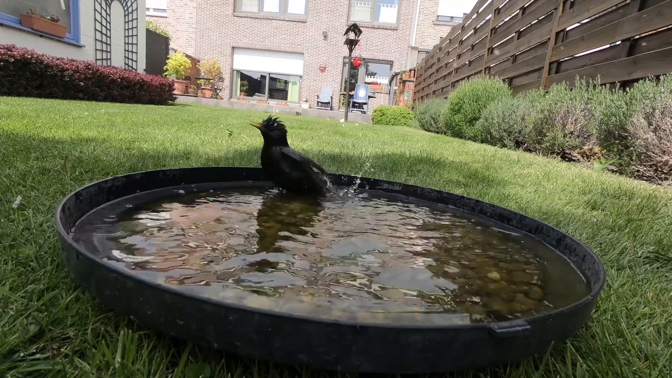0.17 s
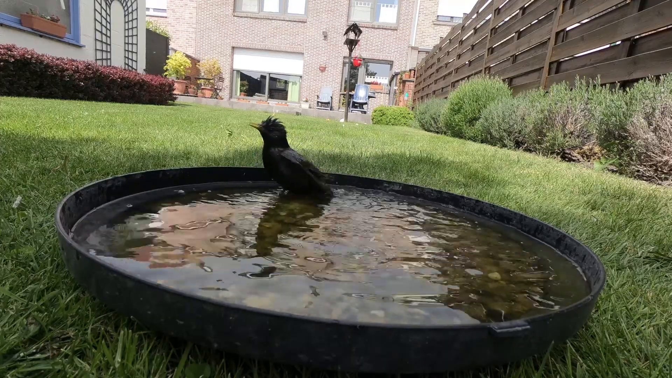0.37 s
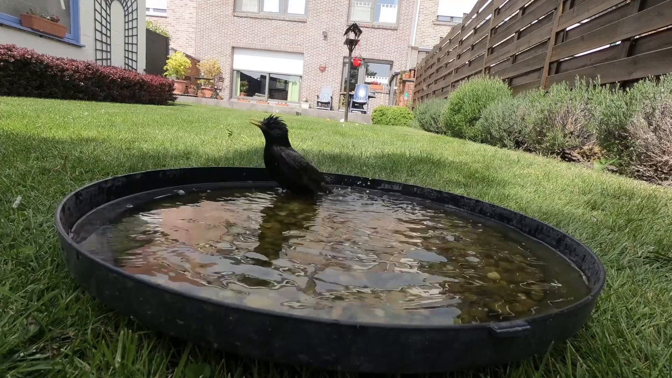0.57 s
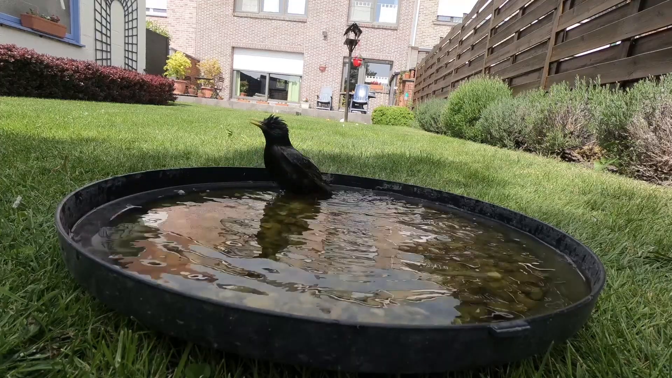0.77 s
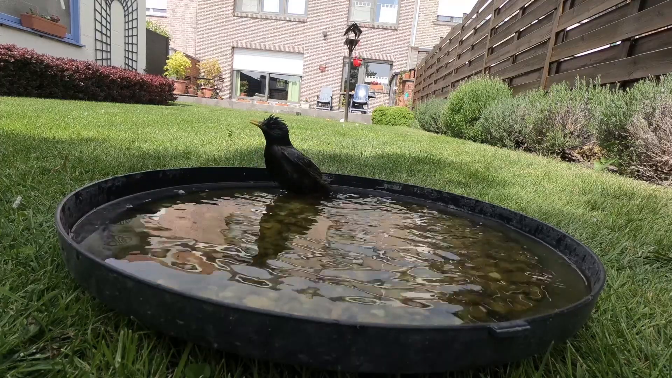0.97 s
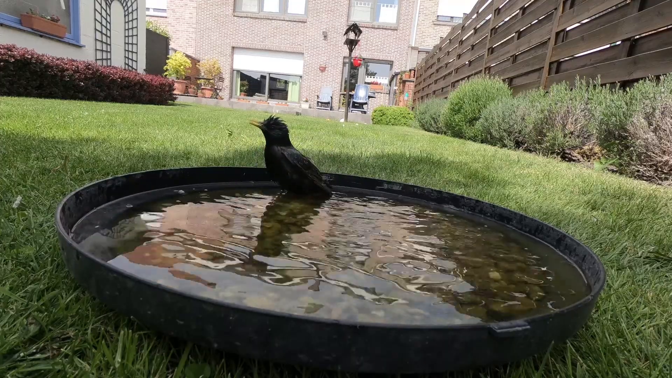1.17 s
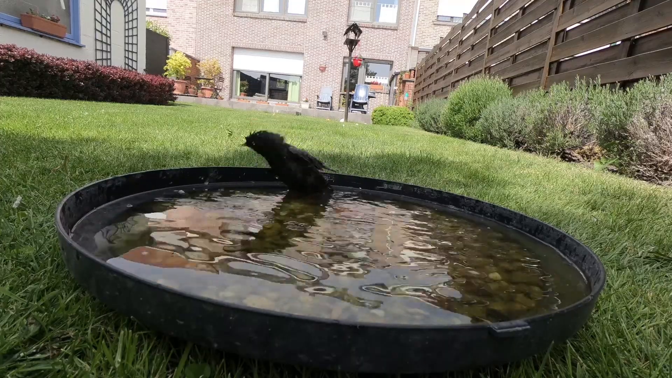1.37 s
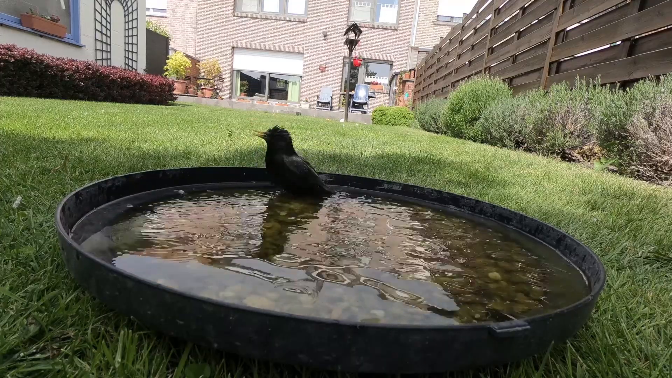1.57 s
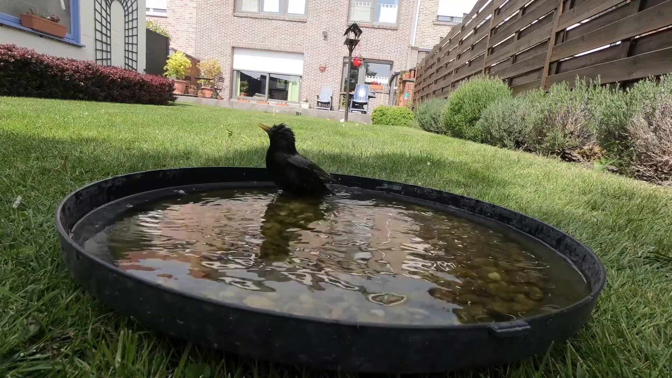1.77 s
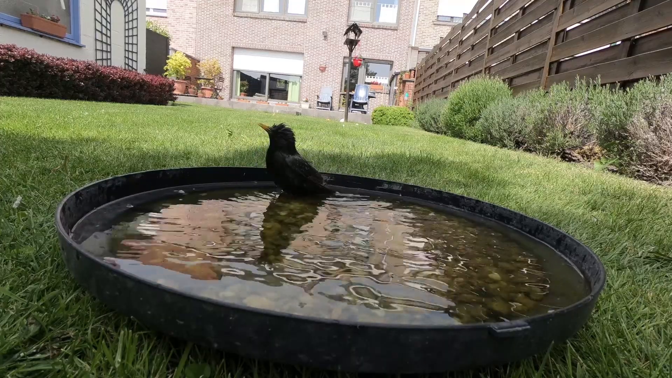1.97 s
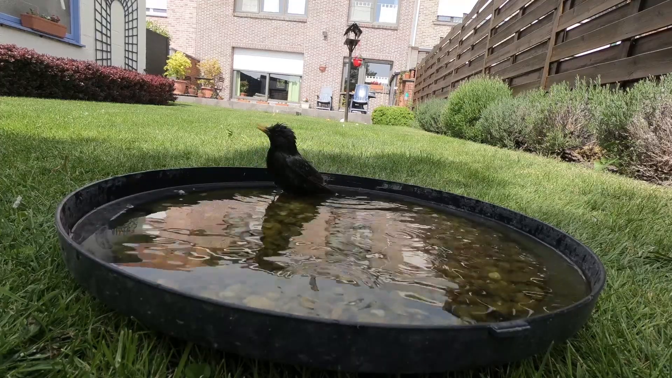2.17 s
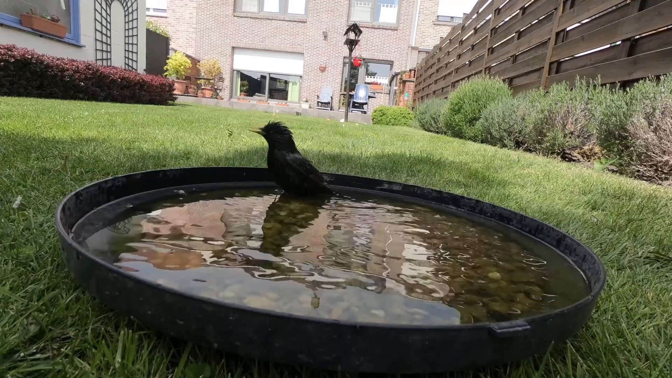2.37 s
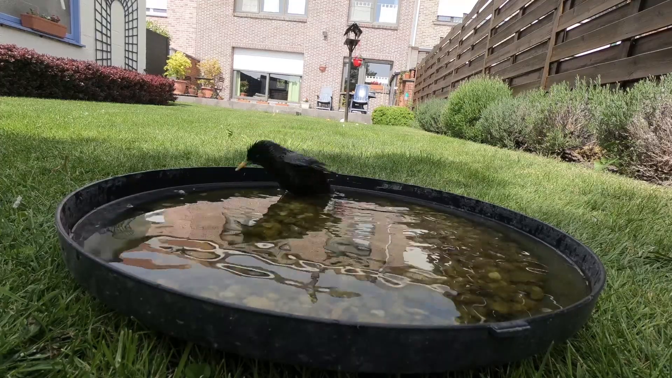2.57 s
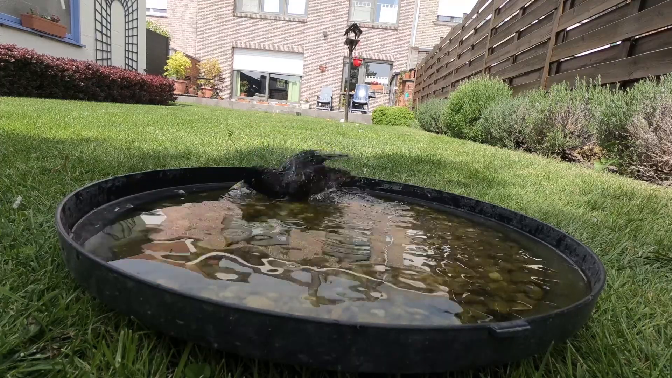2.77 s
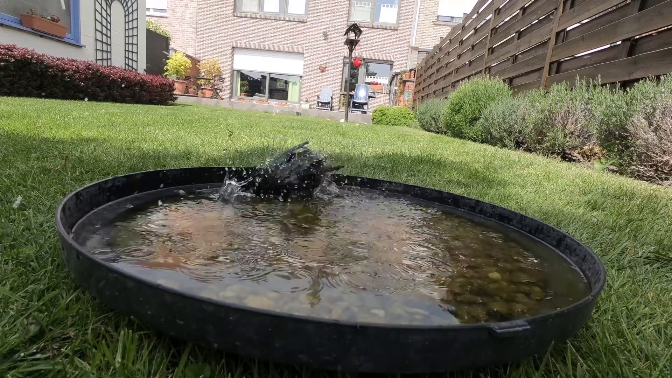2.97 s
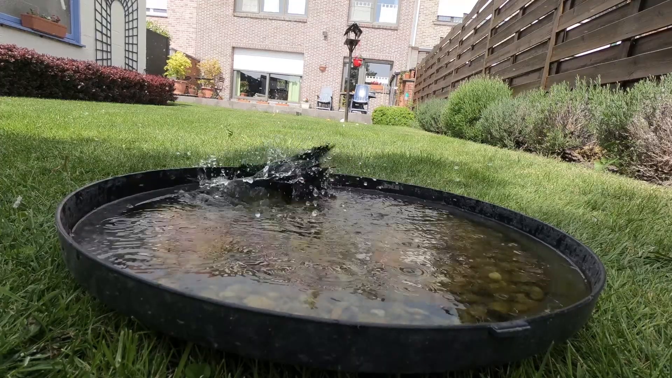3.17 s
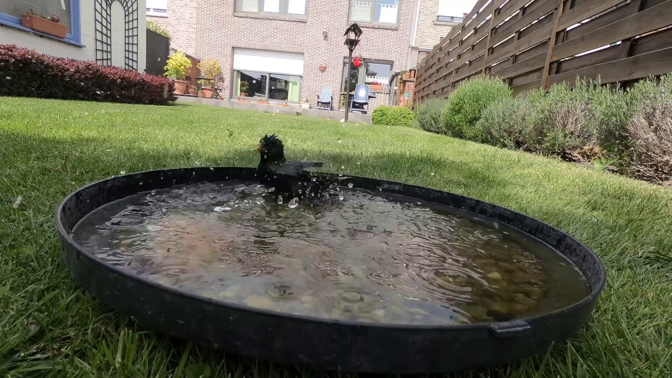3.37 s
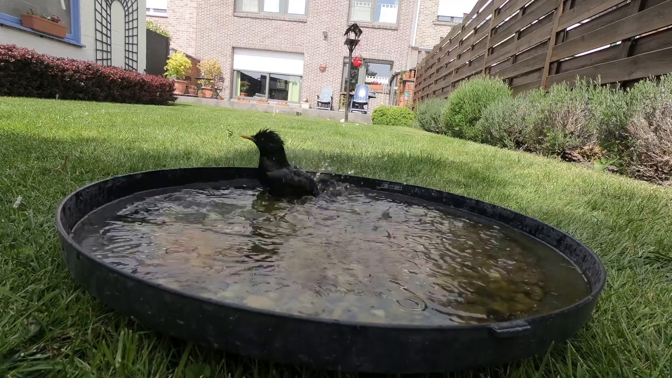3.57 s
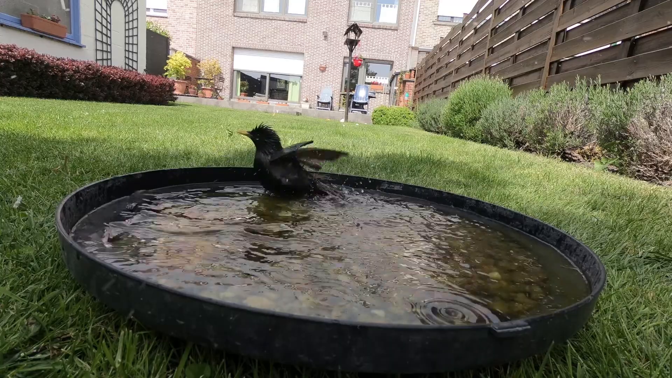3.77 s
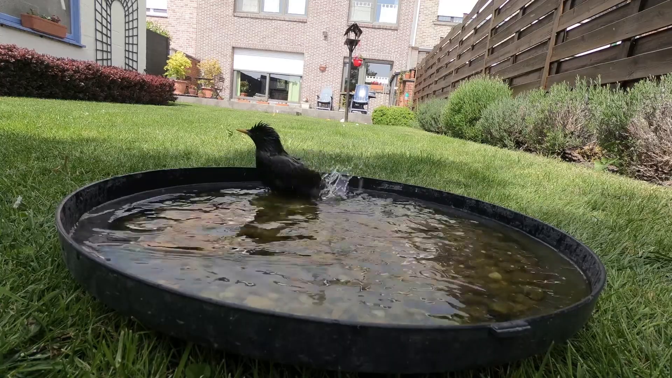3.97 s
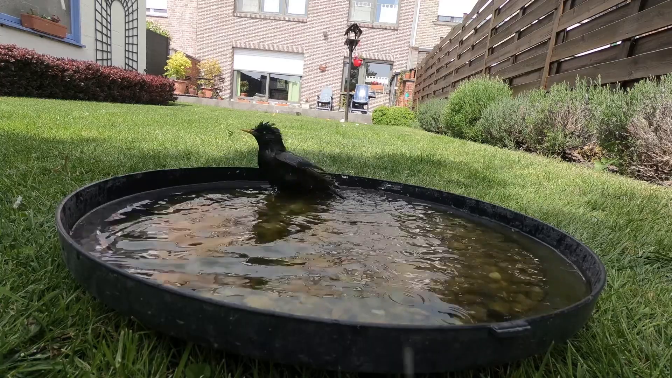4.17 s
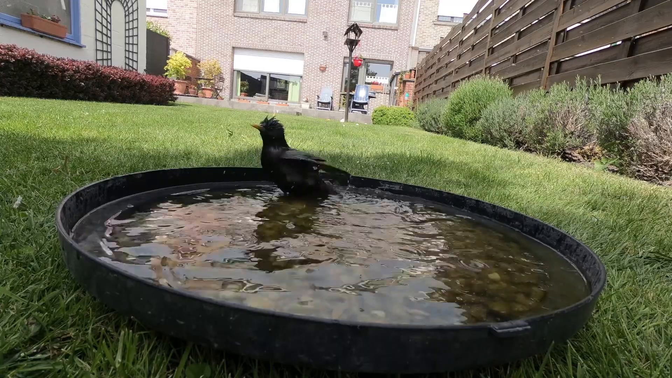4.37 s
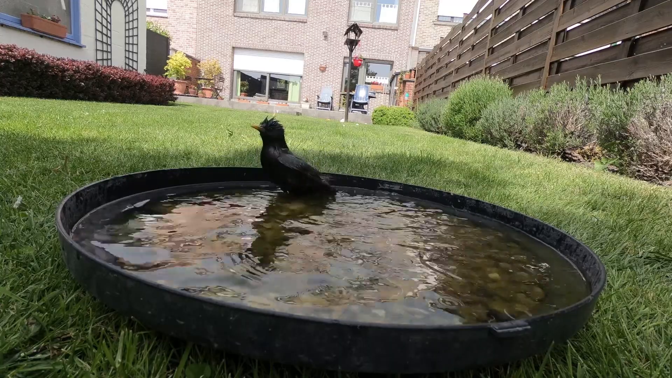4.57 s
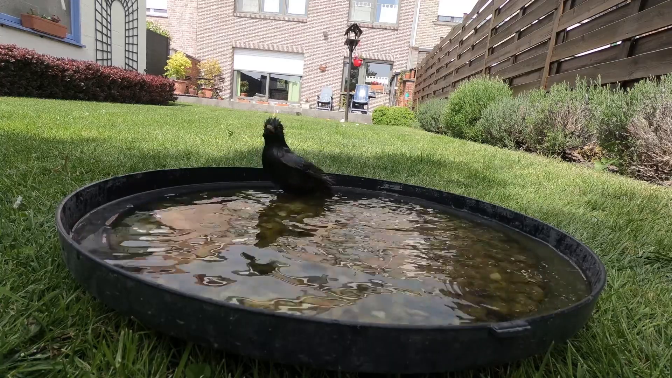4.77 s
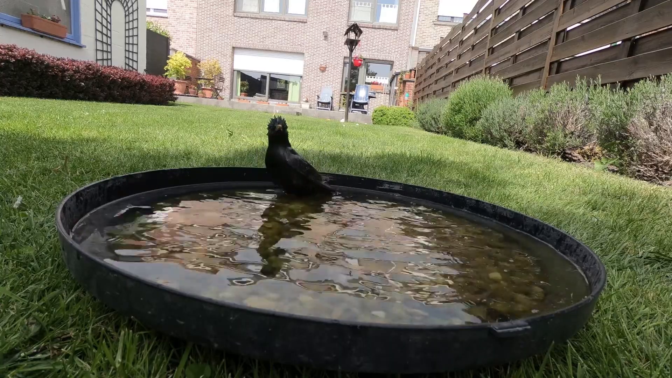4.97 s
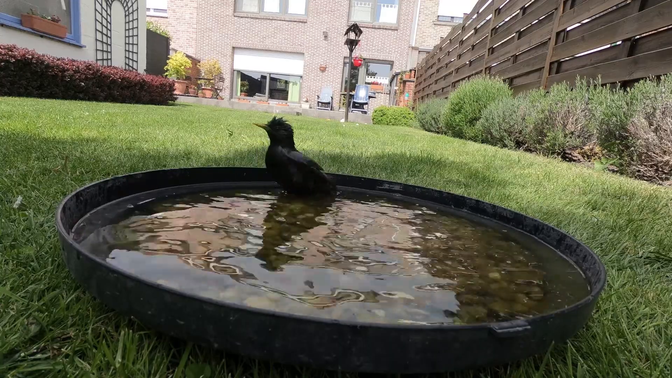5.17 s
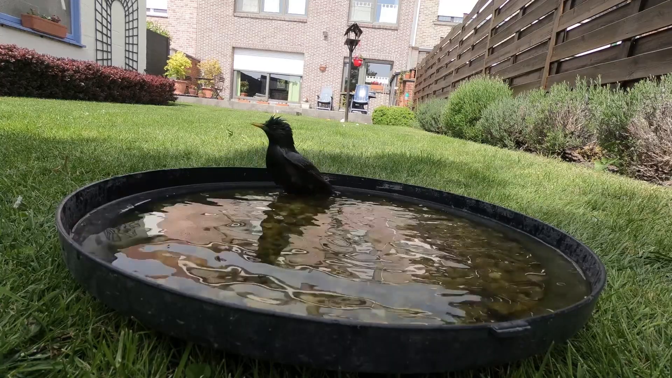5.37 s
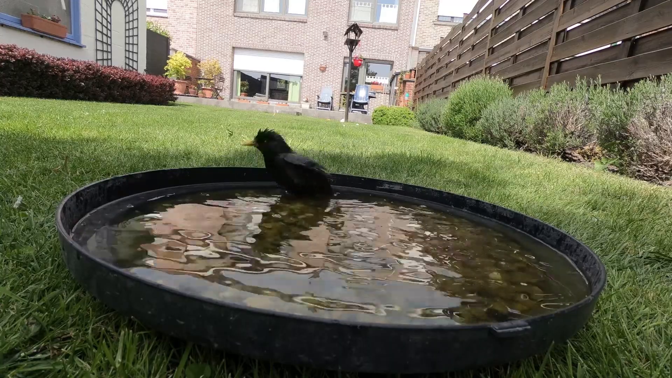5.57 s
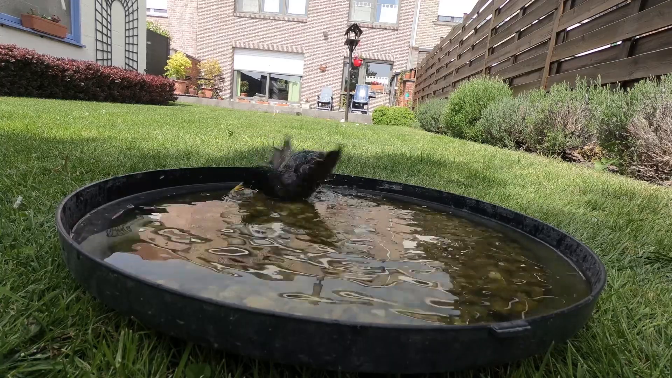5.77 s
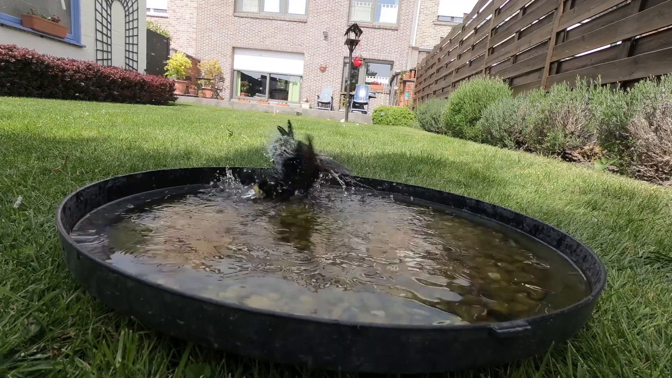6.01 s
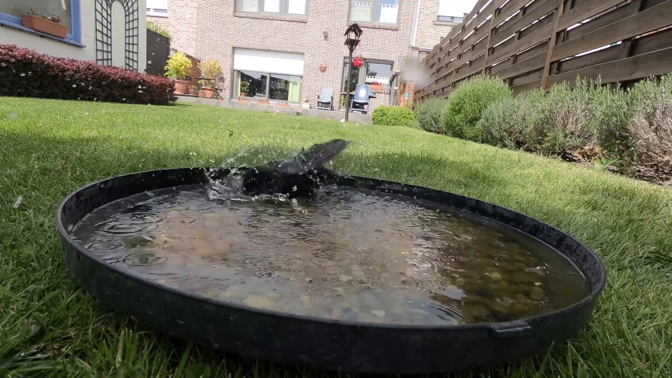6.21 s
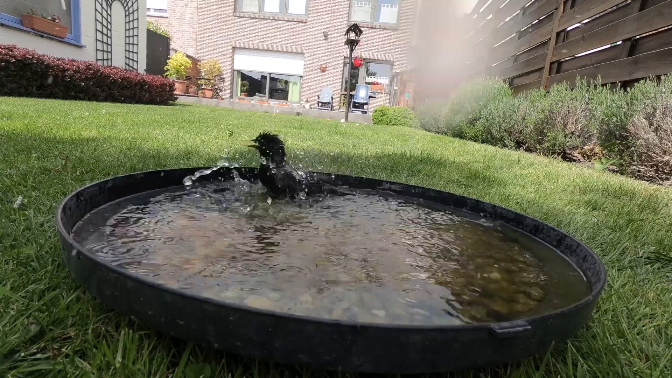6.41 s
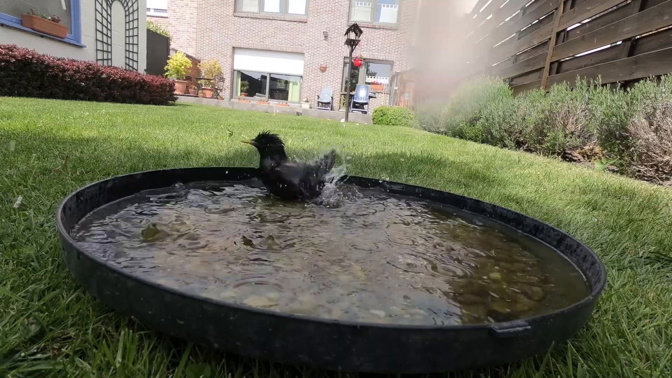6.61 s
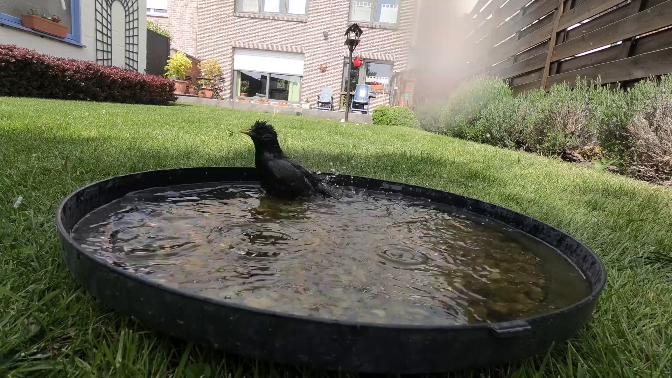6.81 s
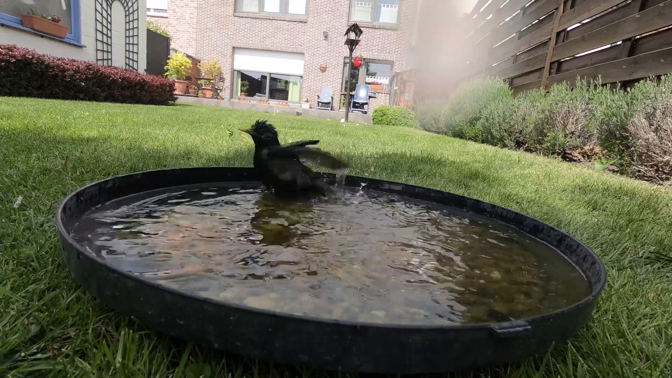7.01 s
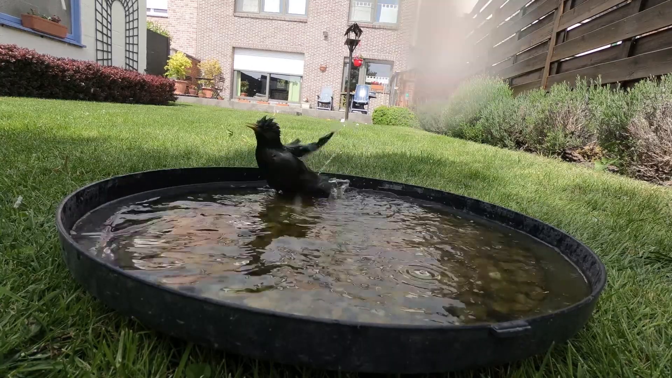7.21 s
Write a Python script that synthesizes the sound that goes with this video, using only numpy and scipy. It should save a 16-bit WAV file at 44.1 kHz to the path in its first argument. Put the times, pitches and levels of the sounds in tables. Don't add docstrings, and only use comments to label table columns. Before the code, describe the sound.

A small bird bathes in a shallow plastic water tray on a lawn, heard fairly close in stereo. From 0 to 0.6 seconds the tail of a flutter gives quick wet slaps, about ten to twelve per second, with light drops. Then it is quiet: low town hum, soft hiss, little wind puffs, faint ticks of ripples at the rim, and small flicks around 1.4 to 1.7. A far dove coos softly from 2.3 to 2.9. At about 2.8 the wings dip, churning dense spray and bubbles, then slap crisply, with sharp cracks near 3.9 and 4.3, ending about 4.6. A thin high rising call sounds at 4.3 with a fainter reply. Calm lapping and ticks return until 5.8. A second burst begins with dull underwater sloshing and heavy spray around 6, a hollow plop near 6.3, then strong regular slaps, plips and low air thumps continuing to the end, about 7.2.

```python
import sys
import numpy as np
from scipy import signal
from scipy.fft import rfft, irfft, next_fast_len
from scipy.io import wavfile
from scipy.ndimage import uniform_filter1d

SR = 44100
rng = np.random.default_rng(int(sys.argv[2]) if len(sys.argv) > 2 else 0)


def file_out(sig):
    cols = np.atleast_2d(sig).T
    lim = np.clip(cols, -1, 1)
    pcm = np.round(lim * 32767).astype(np.int16)
    wavfile.write(sys.argv[1], SR, pcm)


def volts_from_decibels(level):
    exponent = np.asarray(level, float) / 20
    return 10 ** exponent


N = 319725

# frequency in Hz, density in dB per Hz.
WET = [(180, -28), (300, 6.5), (567, -16), (1050, -5.5), (1380, -4), (1630, -3), (2820, -3.5), (4360, -5.5),
       (5070, -8.5), (6100, -3.5), (8380, -9), (9580, -10), (11100, -18), (14600, -18.5), (16400, -49)]
# start in seconds, end in seconds.
DUNKS = [
    (2.9, 3.4),
    (5.85, 6.24),
]


def evened(x):
    return x / np.sqrt(np.mean(x ** 2) + 1e-20)


def read(points, hz):
    f, value = np.transpose(points)
    return np.interp(np.log(hz + 1), np.log(f + 1), value)


def follow(rows, column=1):
    rows = np.array(rows)
    return np.interp(np.arange(N) / SR, rows[:, 0], rows[:, column])


def add(mix, start_s, sound):
    part = mix[max(round(start_s * SR), 0):][:len(sound)]
    part += sound[:len(part)]


def colour(x, points):
    size = next_fast_len(x.shape[-1] + 4096)
    gain = volts_from_decibels(read(points, np.fft.rfftfreq(size, 1 / SR)))
    return irfft(rfft(x, size) * gain, size)[..., :x.shape[-1]]


def ring(x, hz, width_hz):
    return signal.lfilter(*signal.iirpeak(min(hz, SR / 2.2), hz / width_hz, SR), x)


def ring_twice(x, hz, width_hz):
    return ring(ring(x, hz, width_hz), hz, width_hz)


def lumpy(rate_hz, depth_db):
    wander = signal.lfilter(*signal.butter(2, rate_hz, fs=SR), rng.standard_normal(N))
    return evened(rng.standard_normal(N) * volts_from_decibels(depth_db * evened(wander)))


def flutter(length):
    return evened(uniform_filter1d(rng.standard_normal(N), size=length))


def bells(rows, width_s):
    t = np.arange(0, N, 64) / SR
    swell = sum(volts_from_decibels(db) * np.exp(-((t - s) / width_s) ** 2) for s, db in rows)
    return np.interp(np.arange(N) / SR, t, swell)


def dunked(s):
    return any(start < s < end for start, end in DUNKS)


def wing_beats():
    # time in seconds, crack peak in dB, crack colour in Hz, thrown water in dB.
    wading = [(0.0258, -41, 5000, -56), (0.1278, -28.5, 4700, -53.5), (0.218, -48, 2570, -64),
              (0.2337, -26.5, 7060, -53), (0.3325, -36.5, 4200, -56), (0.4205, -26, 7340, -48),
              (0.5145, -35, 2580, -53), (1.5587, -46, 2090, -70), (4.5096, -46, 1560, -59),
              (5.2979, -61.5, 1250, -72)]
    first_dip = [(2.7545, -51.5, 3900, -68.5), (2.7884, -48.5, 6760, -71), (2.8553, -47.5, 7410, -57),
                 (2.9172, -38, 1950, -56), (2.9395, -37.5, 3430, -50), (3.04, -29, 2970, -56),
                 (3.0914, -29, 6860, -48.5), (3.1585, -30.5, 2330, -56), (3.1986, -34.5, 2090, -52.5),
                 (3.2522, -37.5, 1430, -54.5), (3.3018, -42, 3040, -50), (3.3505, -38.5, 5790, -50),
                 (3.4454, -38, 1960, -53.5), (3.4978, -33, 4500, -45), (3.5716, -35.5, 4320, -51.5),
                 (3.6508, -24, 2100, -41.5), (3.7219, -24, 5740, -44), (3.814, -32.5, 1880, -48.5),
                 (3.8833, -45, 3040, -63), (3.8903, -11.5, 6900, -46), (3.9687, -33.5, 1440, -44),
                 (4.0595, -33, 2920, -46), (4.123, -49, 2500, -56.5), (4.1414, -29, 5700, -50),
                 (4.2021, -53, 1280, -67), (4.2193, -39, 3630, -48), (4.3099, -19, 6230, -45.5),
                 (4.3834, -45, 5370, -59), (4.407, -33, 3110, -58)]
    second_dip = [(5.8704, -39, 2130, -52), (5.896, -40, 3140, -55), (5.9586, -38, 3200, -57),
                  (6.0446, -38.5, 1360, -45), (6.1135, -33, 3700, -47), (6.1954, -43, 3690, -50.5),
                  (6.2585, -28.5, 3110, -40), (6.3011, -32.5, 2760, -52), (6.308, -28, 1400, -53),
                  (6.3204, -32, 4440, -51), (6.4003, -35, 2280, -55), (6.4833, -37, 2730, -45.5),
                  (6.5524, -29, 2190, -47.5), (6.6307, -32, 2250, -47.5), (6.6966, -32, 1350, -55),
                  (6.71, -29.5, 3140, -42), (6.79, -21, 4540, -44.5), (6.8681, -23, 7100, -41),
                  (6.957, -20, 3800, -49.5), (7.0491, -21.5, 4100, -45), (7.1366, -16.5, 3820, -42),
                  (7.215, -23.5, 2210, -49), (7.2241, -27.5, 6240, -50.5)]
    # time in seconds, crack peak in dB, crack colour in Hz.
    flicks = [(0.1121, -47, 6000), (0.3199, -51, 2510), (0.405, -45, 7500), (0.611, -49, 1530),
              (0.6266, -29, 3780), (1.4197, -45, 2320), (1.4397, -47, 7810), (1.455, -39, 2380),
              (1.491, -48, 1960), (1.6519, -40, 1470), (2.9981, -52, 3070), (3.019, -38, 3640),
              (3.1459, -37.5, 1340), (3.4808, -41, 2400), (3.5828, -31, 4670), (3.638, -34.5, 2230),
              (3.706, -45, 1610), (3.751, -39, 1960), (3.8029, -27.5, 2060), (4.044, -41, 1450),
              (4.2958, -40.5, 1260), (4.3982, -26, 4800), (4.616, -46.5, 1670), (4.635, -40.5, 1040),
              (5.786, -51, 3510), (6.1472, -34.5, 2820), (6.172, -33, 1810), (6.24, -40, 3270),
              (6.5182, -31, 1400), (6.76, -36, 3660)]
    late_flick = (7.12, -44.5, 3200)
    beats = []
    for s, db, hz, throw_db in wading + first_dip + second_dip:
        push_db = -34.5 + .38 * (db + 32) + .28 * (throw_db + 48)
        push_db += -6 * dunked(s)
        beats.append((s, db, hz, throw_db, push_db))
    for s, db, hz in flicks + [late_flick]:
        beats.append((s, db, hz, db - 23.5, db - 21))
    return sorted(beats)


def slaps():
    cracks, thrown, pushes = np.zeros((3, N))
    t = np.arange(2600) / SR
    beats = wing_beats()
    noise = rng.standard_normal((len(beats), 2, len(t)))
    for (s, db, hz, thrown_db, push_db), (crack_noise, tray_noise) in zip(beats, noise):
        burst = crack_noise * (t / .0004) * np.exp(-t / 0.00056)
        bright = hz / 3000 * ring(burst, 9850, 1300)
        burst = colour(burst + 3.0 * ring(burst, hz, 900) + bright, WET)
        burst = signal.lfilter(*signal.butter(2, min(900, hz / 7.5), "high", fs=SR), burst)
        add(cracks, s, volts_from_decibels(db) * burst / abs(burst).max())

        sheet_s = t / (1.85 if dunked(s) else 1)
        add(thrown, s - .008, volts_from_decibels(thrown_db) * (sheet_s / 0.0083) ** 2 * np.exp(2 - sheet_s / 0.0044))

        turns = 78 * (t - .012)
        puff = np.sin(2 * np.pi * turns) * np.exp(-(turns / .42) ** 2)
        thrum = evened(ring_twice(tray_noise, 160, 90)) * (t / 0.0086) * np.exp(-t / 0.0089)
        add(pushes, s - .011, volts_from_decibels(push_db) * (.75 * thrum - puff))
    return cracks, thrown, pushes


def bubble(hz, cycles, rise_oct, soft_cycles):
    t = np.arange(int(max(cycles, 2) / hz * SR) + 8) / SR
    u = t / t[-1]
    phase = 2 * np.pi * np.cumsum(hz * 2 ** (rise_oct * u)) / SR
    return np.sin(phase) * (1 - np.exp(-t * hz / soft_cycles)) * volts_from_decibels(-24 * u)


def bubbles():
    # time in seconds, peak in dB, pitch in Hz.
    plain = [(0.1804, -50.5, 4540), (1.6841, -43.5, 2620), (1.8645, -46, 7700), (3.095, -32.5, 4130),
             (3.4299, -25, 9700), (3.6284, -34, 2680), (3.7762, -28.5, 2240), (3.773, -36, 1500),
             (3.78, -37, 2900), (4.2394, -45, 2360), (4.3313, -41.5, 2800), (6.3283, -26, 4400),
             (6.3378, -35.5, 2380), (6.448, -34, 3150), (6.594, -34.5, 3150), (6.6125, -37, 2270),
             (7.0167, -32.5, 4910), (7.1491, -36, 4250), (7.179, -36.5, 2800)]
    # time in seconds, peak in dB, pitch in Hz, ring in cycles, rise in octaves.
    glides = [(3.3751, -11, 5570, 5.2, -0.05), (6.3082, -16, 1400, 9, -0.05), (4.3106, -27, 1840, 6, 0.05),
              (6.868, -28, 2000, 6, 0.05), (3.041, -37, 750, 3.1, 0.45), (6.308, -22.5, 620, 2, -0.6),
              (4.15, -44, 3400, 60, 0.12), (4.635, -48, 1035, 20, 0.069), (3.654, -40, 1007, 21, 0.21),
              (3.814, -41.5, 1780, 34, 0.63), (5.93, -38.5, 1280, 17, 0.96), (6.029, -35, 2650, 30, 0.4),
              (6.6247, -30, 1526, 9, .1), (6.9185, -40, 2090, 8, .1), (6.9357, -43, 1400, 6, .1),
              (3.022, -50, 3600, 90, .03), (2.897, -50, 2000, 35, .2), (0.4215, -34, 2250, 8, .05),
              (6.068, -37, 1280, 55, 1), (6.108, -48, 2980, 45, 0.53), (6.2, -41, 3780, 50, -0.1),
              (6.662, -31, 2230, 22, 0.13)]
    # time in seconds, peak in dB, pitch in Hz, ring in cycles.
    early_drops = [(0.0375, -52.5, 2300, 6), (0.071, -51.5, 4820, 19), (0.174, -51.0, 1450, 7),
                   (0.2382, -38.0, 4020, 10), (0.2685, -46.5, 5000, 8), (0.297, -59.0, 2320, 25),
                   (0.3499, -49.5, 3220, 16), (0.361, -51.5, 7000, 10), (0.4053, -41.0, 5050, 14),
                   (0.4307, -39.5, 7350, 17), (0.4995, -56.0, 3000, 6), (0.524, -45.5, 3100, 12),
                   (0.5375, -45.0, 2180, 9), (0.6338, -39.5, 7010, 17)]
    first_drops = [(2.8235, -50.0, 3840, 15), (2.8602, -45.0, 7460, 30), (2.8936, -43.0, 2070, 8),
                   (2.9315, -33.5, 6090, 13), (2.9665, -37.0, 3680, 12), (2.9985, -43.0, 6000, 4),
                   (3.0298, -35.5, 3560, 14), (3.0755, -34.5, 3000, 4), (3.0912, -27.0, 6890, 26),
                   (3.1091, -37.5, 6780, 27), (3.159, -45.5, 9650, 20), (3.1979, -40.5, 9650, 23),
                   (3.2115, -35.5, 2500, 4), (3.2144, -49.0, 4480, 31), (3.2593, -45.5, 1380, 7),
                   (3.3207, -44.0, 9880, 31), (3.3411, -41.0, 6090, 24), (3.3531, -44.0, 9880, 29),
                   (3.3621, -37.0, 2410, 6), (3.383, -37.5, 6430, 26), (3.3905, -42.5, 9990, 20),
                   (3.4374, -41.0, 1490, 6), (3.4813, -44.0, 6780, 12), (3.5022, -34.5, 4360, 13),
                   (3.5087, -40.5, 6890, 28), (3.5172, -43.5, 6780, 21), (3.5466, -44.0, 2640, 11),
                   (3.5671, -48.0, 1950, 8), (3.609, -43.0, 5570, 10), (3.6414, -44.0, 9300, 35),
                   (3.6514, -44.0, 9420, 40), (3.6559, -34.5, 1150, 8), (3.7287, -42.0, 7240, 40),
                   (3.7705, -43.0, 4800, 10), (3.7819, -43.0, 1490, 15), (3.815, -30.5, 6320, 15),
                   (3.8963, -32.0, 9760, 37), (3.9597, -42.0, 3330, 13), (3.9712, -34.0, 6890, 28),
                   (4.059, -36.0, 1490, 6), (4.0643, -49.0, 7010, 40), (4.0665, -46.0, 1700, 8),
                   (4.0999, -45.0, 2640, 11), (4.1468, -30.5, 4710, 13), (4.1523, -33.5, 7120, 7),
                   (4.2201, -35.5, 7580, 16), (4.491, -50.0, 3000, 4)]
    second_drops = [(5.8915, -37.0, 3800, 6), (5.9287, -41.5, 4590, 11), (5.9432, -33.5, 1950, 8),
                    (5.9651, -44.0, 7010, 35), (6.0365, -33.0, 4940, 20), (6.0465, -29.0, 2410, 10),
                    (6.0794, -29.0, 3220, 7), (6.0862, -40.0, 1950, 27), (6.1143, -34.0, 3900, 23),
                    (6.1395, -37.0, 7300, 10), (6.1487, -32.5, 1720, 7), (6.1587, -42.5, 10110, 38),
                    (6.1727, -42.5, 1840, 7), (6.1772, -35.0, 1840, 7), (6.2156, -36.5, 2990, 15),
                    (6.242, -45.0, 6780, 27), (6.2572, -28.0, 5510, 10), (6.265, -29.5, 3330, 13),
                    (6.3153, -33.5, 5630, 15), (6.3213, -38.5, 5970, 19), (6.3518, -35.0, 1490, 6),
                    (6.3762, -41.5, 5860, 29), (6.4331, -38.0, 5630, 12), (6.4376, -42.0, 1380, 7),
                    (6.4471, -39.5, 9650, 20), (6.4535, -43.5, 2530, 18), (6.484, -44.5, 6200, 23),
                    (6.49, -32.0, 3220, 8), (6.5438, -36.0, 1950, 10), (6.5578, -40.0, 2530, 15),
                    (6.6037, -37.0, 6200, 20), (6.6246, -45.5, 3560, 28), (6.6618, -28.0, 5280, 6),
                    (6.7114, -32.5, 1840, 9), (6.7194, -33.0, 7010, 26), (6.7605, -40.0, 3560, 20),
                    (6.7992, -37.0, 2640, 11), (6.842, -52.0, 4000, 8), (6.8746, -41.0, 7010, 21),
                    (6.8786, -41.5, 7690, 21), (6.8846, -42.5, 3450, 14), (6.902, -50.5, 9190, 35),
                    (6.952, -40.5, 4900, 6), (7.0582, -40.5, 1610, 6), (7.0691, -45.0, 5170, 19),
                    (7.142, -40.0, 9650, 23), (7.2298, -31.5, 5510, 6)]
    rise_oct = 0.1
    rows = [(s, db, hz, 15, rise_oct) for s, db, hz in plain] + glides
    for s, db, hz, cycles in early_drops + first_drops + second_drops:
        rows.append((s, db - 1.5, hz, cycles, rise_oct))
    out = np.zeros(N)
    for s, db, hz, cycles, rise in rows:
        add(out, s, volts_from_decibels(db) * bubble(hz, cycles, rise, min(.8, cycles / 14)))
    return out


def water(drops_per_s, spread_db, hiss, blobs):
    out = hiss * lumpy(120, 2.6)
    for share, top_hz, rate, cycles in ((1, 14000, drops_per_s, 9), (blobs, 5500, 14, 16)):
        layer = np.zeros(N)
        for hz in np.geomspace(1100, top_hz, num=18):
            count = int(rate * N / SR)
            size = volts_from_decibels(spread_db * np.minimum(rng.exponential(size=count), 3.5))
            at = rng.integers(0, N, count)
            drop = bubble(hz, cycles * rng.uniform(.5, 1.6), .35, 1.2) * hz
            index = at[:, None] + np.arange(len(drop))
            layer += np.bincount(index.ravel(), np.outer(size, drop).ravel(), N)[:N]
        out = out + share * evened(layer)
    return evened(colour(out, WET))


def spray(thrown):
    # time in seconds, level in dB, tilt in dB per octave.
    showers = [
        [(0.0, -69.5, -3.5), (0.33, -76, 8), (0.75, -88, 9)],
        [(1.38, -80, 1), (1.638, -70.5, -2), (1.85, -79.5, -3)],
        [(2.7, -85, 3), (2.87, -58, -2), (3.02, -52.5, 2), (3.17, -62, -1), (3.42, -56, 0), (3.52, -61, -1),
         (3.72, -61, -2.5), (4.01, -69, 2), (4.23, -69, 4), (4.7, -80.5, 4.5)],
        [(5.72, -91.5, 13), (5.886, -57.5, -3.5), (6.042, -51.5, 3), (6.166, -54.3, 1), (6.682, -60.5, -1.5),
         (6.926, -63.5, 1), (7.25, -66, 0.5)],
    ]
    lapping_db = -84.5
    shower = water(320, 4.4, .48, .3)
    torn = water(300, 4.3, .58, .22)
    rows = []
    for part in showers:
        rows += [(part[0][0] - .03, lapping_db, 0), *part, (part[-1][0] + 0.027, lapping_db, 0)]
    dull = signal.lfilter(*signal.butter(1, 3500, fs=SR), shower)
    tilt = volts_from_decibels(np.clip(follow(rows, column=2), -12, 12))
    return volts_from_decibels(follow(rows)) * (dull / tilt + (shower - dull) * tilt) + thrown * torn


def slosh():
    # time in seconds, level in dB.
    heaves = [(2.86, -56), (3.3, -58), (4.98, -62.5), (6.2, -52), (6.5, -56)]
    return bells(heaves, 0.074) * evened(ring_twice(rng.standard_normal(N), 280, 120))


def ticks():
    tick_times = [0.6914, 0.7796, 0.86, 0.9049, 0.9393, 0.9622, 1.0216, 1.1029, 1.1822, 1.8231, 2.0595,
                  2.1393, 2.506, 2.5813, 4.7062, 4.8988, 4.9432, 4.9796, 5.0579, 5.0899, 5.4231, 5.6211,
                  5.7703]
    out, t = np.zeros(N), np.arange(900) / SR
    for s, noise in zip(tick_times, rng.standard_normal((len(tick_times), len(t)))):
        tick = noise * (t / .002) * np.exp(-t / .003)
        tick = ring_twice(tick, 7500, 2000) + .5 * ring_twice(tick, 9900, 1800)
        add(out, s - .001, volts_from_decibels(-65.5 + 2 * noise[0]) * tick / abs(tick).max())
    return out


def whistle(rows, waver):
    hz = follow(rows) * (1 + waver * flutter(300))
    rows = [(rows[0][0] - .01, 0, -110), *rows, (rows[-1][0] + .01, 0, -110)]
    return np.sqrt(2) * volts_from_decibels(follow(rows, column=2)) * np.sin(2 * np.pi * np.cumsum(hz) / SR)


def thin_calls():
    # time in seconds, pitch in Hz, level in dB.
    peep = [(2.563, 4150, -92), (2.577, 4150, -79), (2.592, 4150, -92), (2.6, 4150, -110)]
    call = [(4.25, 4200, -110), (4.255, 4400, -66), (4.265, 5800, -63), (4.27, 5850, -54),
            (4.293, 5850, -53), (4.3, 5840, -80), (4.31, 5840, -110)]
    answer = [(4.345, 3800, -110), (4.356, 4200, -68), (4.372, 5200, -70), (4.38, 4000, -100),
              (4.43, 4050, -80), (4.452, 4200, -75), (4.47, 4100, -95)]
    return whistle(peep + call + answer, .003)


def far_dove():
    # start in seconds, length in seconds, first pitch in Hz, last pitch in Hz, level in dB.
    dove_coos = [(2.258, .115, 748, 733, -61), (2.42, .12, 716, 715, -66), (2.55, .06, 715, 716, -69),
                 (2.615, .165, 740, 736, -55), (2.785, .155, 728, 855, -59.5)]
    # share of length 0-1, level in dB.
    coo_swell = [(0, -13), (.3, 0), (.82, -3), (1, -17)]
    rows = []
    for s, length_s, hz, last_hz, db in dove_coos:
        for u, swell_db in coo_swell:
            rows.append((s + u * length_s, hz + u * (last_hz - hz), db + swell_db))
    return whistle(rows, 0.0034)


def breeze():
    # time in seconds, level in dB.
    puffs = [(0.04, -40), (0.14, -43), (0.28, -47), (0.44, -43), (0.58, -48.5), (0.88, -54), (1.82, -54),
             (2.5, -46), (2.85, -43.5), (3.2, -53), (3.41, -46.5), (3.74, -46), (3.86, -48), (4.2, -54),
             (4.41, -49), (5.42, -52), (5.65, -56), (5.88, -51), (6.07, -53), (6.26, -48), (6.42, -44),
             (6.74, -47), (7.15, -44), (7.25, -39)]
    # frequency in Hz, density in dB per Hz.
    gust = [(8.8, -42.5), (15, -3.5), (48, 2.5), (109, -14), (128, -23), (146, -15.5), (200, -21.5),
            (260, -48), (440, -120)]
    return (volts_from_decibels(-62) + bells(puffs, .055)) * evened(colour(lumpy(6.1, 3.0), gust))


def port_hiss():
    return volts_from_decibels(-33) * evened(ring_twice(lumpy(25, 1.7), 7200, 2400))


def town():
    # frequency in Hz, density in dB per Hz.
    hum_spectrum = [(59, -49.5), (100, -20), (153, 3.5), (309, -16.5), (567, -31), (707, -22.5),
                    (1020, -31.5), (1430, -33.5), (2470, -41.5), (5420, -47), (7490, -43.5), (12400, -48.5),
                    (16500, -62)]
    # frequency in Hz, level in dB.
    hum_side = [(60, -9), (110, -9.5), (200, -2.5), (380, 2), (700, 10.5), (1290, 8.5), (2380, 3.5),
                (4400, -3.5), (8120, 2.5), (15000, -6.5)]
    # time in seconds, level in dB.
    hum_level = [(0.0, -53.5), (0.32, -56.5), (1.35, -59.5), (3.84, -56.5), (4.4, -57.5), (5.63, -59),
                 (6.34, -51), (7.25, -57)]
    hum = [evened(colour(lumpy(8.8, 1.37), hum_spectrum)) for port in range(2)]
    swell = volts_from_decibels(follow(hum_level) + 2.0)
    return swell * (hum[0] + port_hiss()), swell * (colour(hum[1], hum_side) + port_hiss())


def garden(x, t60_s, far_hz):
    t = np.arange(SR // 2) / SR
    tail = rng.standard_normal((2, len(t))) * volts_from_decibels(-60 * t / t60_s) * (t > .012)
    tail = signal.lfilter(*signal.butter(1, far_hz, fs=SR), tail)
    return signal.fftconvolve(x[None], tail / np.linalg.norm(tail[0]), axes=1)[:, :N]


def ports(x):
    # frequency in Hz, level in dB, lead in radians, following share 0-1.
    port_rows = [(55, -13, 3.2, .65), (170, -8, 3.4, .6), (320, -4, 3.1, .5), (520, 3, 3.0, .3),
                 (740, 4, 2.1, .8), (1050, 5, 1.9, .8), (1400, -1, 1.5, .92), (2100, -4, 1.45, .85),
                 (3000, -7.5, 1.45, .7), (4300, -12.5, 2.1, .62), (5800, -4.5, 2.8, .75),
                 (7400, -3.5, 2.0, .35), (9500, -5, 4.1, .3), (13000, -3.5, 3.0, .2)]
    hz, _, z = signal.stft(x, SR, nperseg=256)
    f, db, lead, share = np.transpose(port_rows)
    db, lead, share = (read(np.c_[f, c], hz)[:, None] for c in (db, lead, share))
    drift = uniform_filter1d(rng.standard_normal((2, *z.shape)), size=3, axis=1)
    drift = uniform_filter1d(drift, size=3, axis=2)
    loose = np.exp(1j * np.arctan2(*drift))
    z = z * volts_from_decibels(db) * (share * np.exp(1j * lead) + 1.1 * np.sqrt(1 - share ** 2) * loose)
    return signal.istft(z, SR, nperseg=256)[1][:N]


def scene():
    cracks, thrown, pushes = slaps()
    call, dove = thin_calls(), far_dove()
    near = cracks + bubbles() + spray(thrown) + ticks() + call
    back = volts_from_decibels(-28) * garden(near, .2, 6000)
    back = back + volts_from_decibels(-5) * garden(call * flutter(70), .5, 9000)
    back = back + volts_from_decibels(-19) * garden(dove, .25, 3000)
    total, apart = town()
    direct = near + pushes + dove + breeze() + slosh() + back[0]
    apart = apart + ports(direct + 0.5 * total) + .7 * back[1]
    return np.array([total + direct + apart, total + direct - apart])


def band_limit(x):
    return signal.sosfilt(signal.butter(12, 16520, fs=SR, output="sos"), x)


def record(dry):
    hz, _, z = signal.stft(dry, SR, nperseg=2048)
    power = uniform_filter1d((abs(z) ** 2).mean(0), size=40, axis=0)
    faint = np.percentile(power[np.argmin(abs(hz - 12700))], 24)
    kept = (hz[:, None] < 11800) | (power > faint)
    kept = np.minimum.accumulate(kept[::32], axis=0).repeat(32, axis=0)[:len(hz)]
    mix = signal.istft(z * kept, SR, nperseg=2048)[1][:, :N]
    return band_limit(mix)


dry = scene()
out = record(dry)
file_out(out)
```